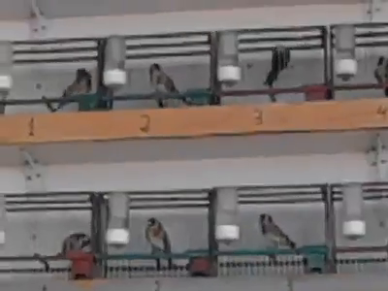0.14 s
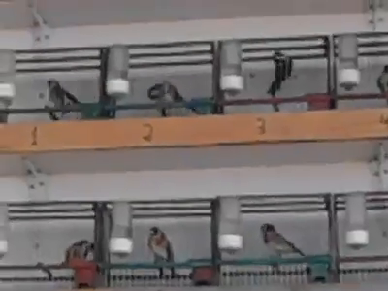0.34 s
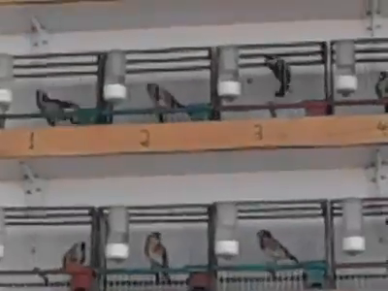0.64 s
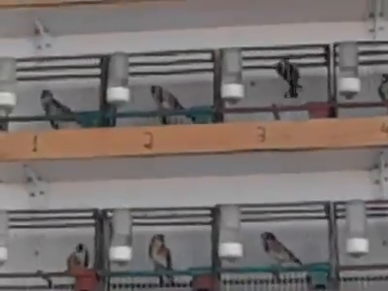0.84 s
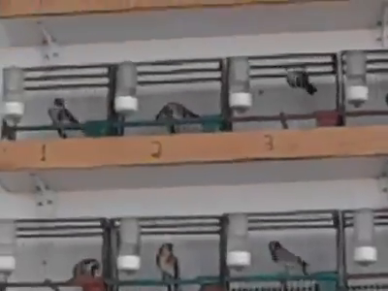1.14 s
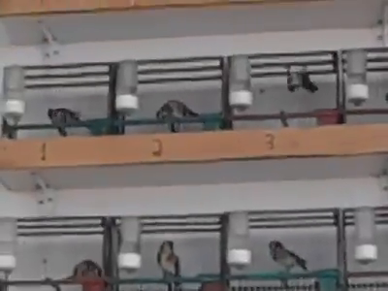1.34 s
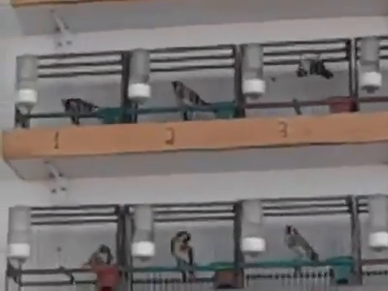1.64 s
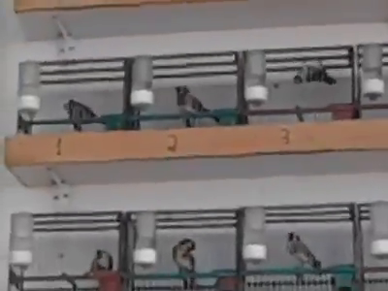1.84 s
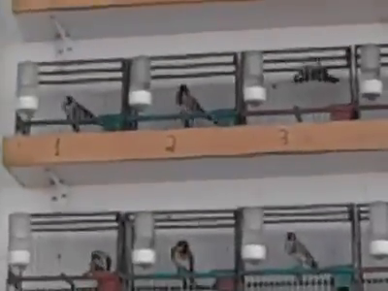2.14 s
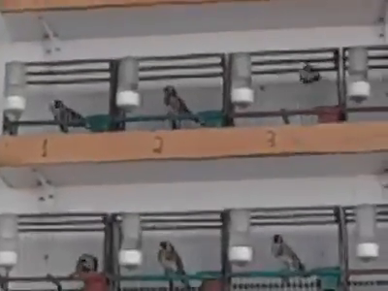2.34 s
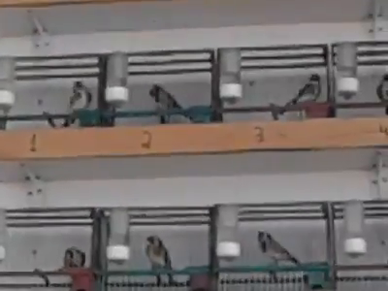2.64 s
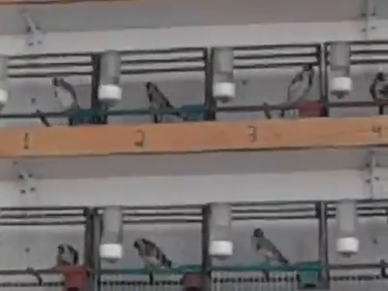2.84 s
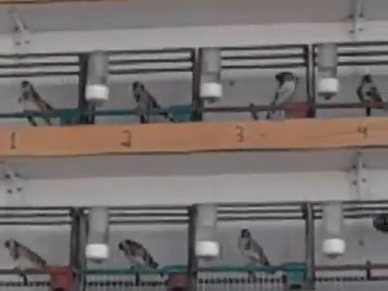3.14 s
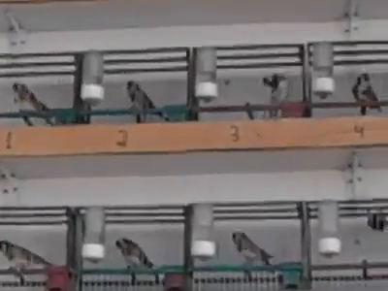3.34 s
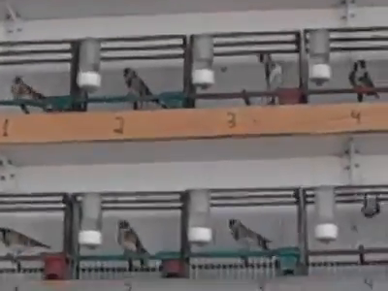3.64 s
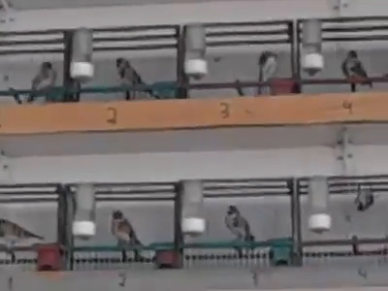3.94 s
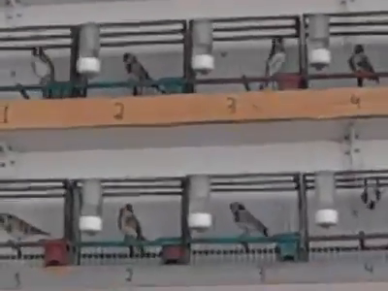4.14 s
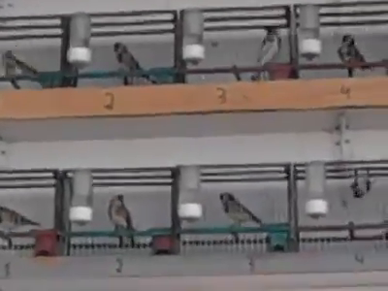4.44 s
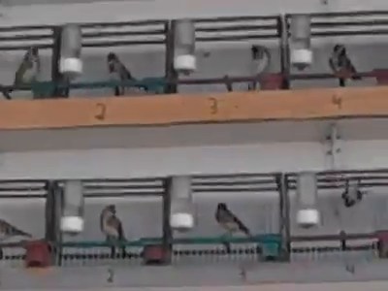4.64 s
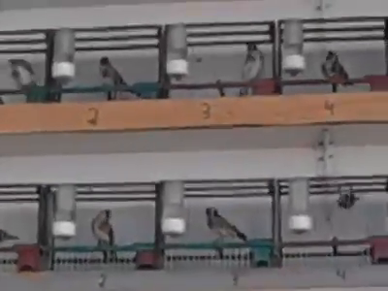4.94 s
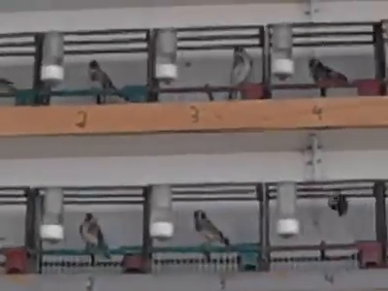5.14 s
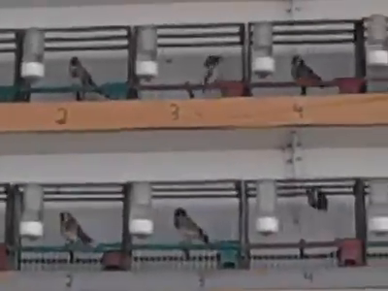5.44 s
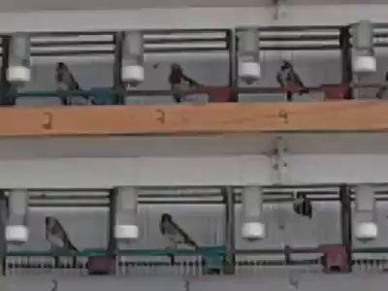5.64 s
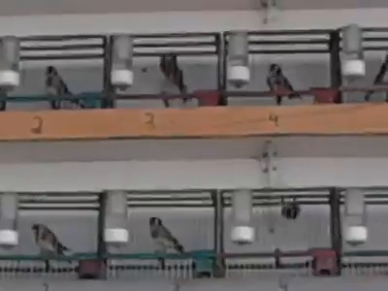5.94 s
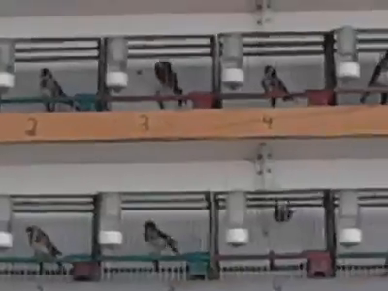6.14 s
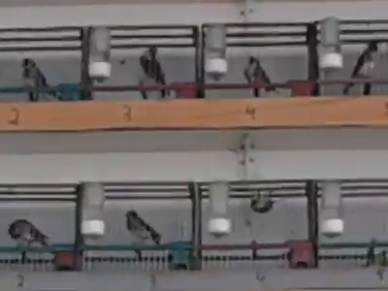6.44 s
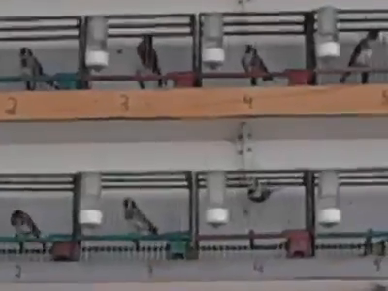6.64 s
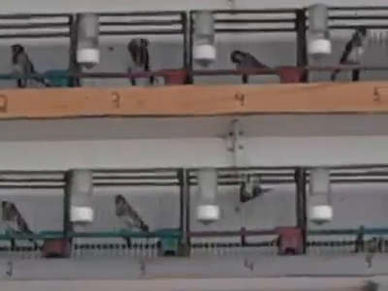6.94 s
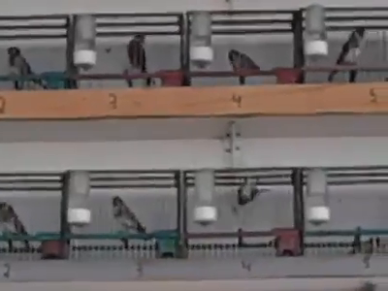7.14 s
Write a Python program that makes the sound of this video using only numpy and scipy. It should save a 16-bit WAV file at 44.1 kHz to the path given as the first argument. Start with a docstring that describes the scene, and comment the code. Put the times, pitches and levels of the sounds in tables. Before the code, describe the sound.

Goldfinches sing in cages in a hard room with a short bright ring, over soft hiss and faint low air noise. At 0 s distant twitters and a high peep sound; about 0.3 s a slurred phrase begins with a faint dull knock, closing on a piercing whistle before a harsh, chattering scold at 0.5. A fuzzy wheeze drifts from 0.55 to 2.6, with a fainter, higher rising one around 0.9-1.3. A quick tumbling phrase comes at 1.3, a softer slur at 1.9, another at 2.6. At 2.95 slur and scold overlap with chatter, while a quiet low scraping drone runs until 3.7. Another tumble follows, then sharp calls near 4.0. It thins until a scold and flurry at 5.15. Snappy chups and flicks lead to a strong slur at 5.9 and a tumble at 6.26; after a lull, dense calls and a final slur fill 6.9-7.2.

```python
"""Caged goldfinches twitter in a hard-walled room. Far-off twittering and single calls open the scene.
A knock and the first slurred phrase follow, then a scold, two long wheezes and a tumbling phrase.
Near the middle a droning scrape sounds; a narrow hiss and a low hum swell now and then; the phrases return
to the end. Birds are gliding tones, with noise to roughen them; echoes make the cages and the room.
All levels in dB are before the mixing at the end."""
import sys
import numpy as np
from scipy import signal
from scipy.fft import rfft, irfft
from scipy.io import wavfile
from scipy.ndimage import uniform_filter1d

SR = 44100
rng = np.random.default_rng(int(sys.argv[2]) if len(sys.argv) > 2 else 0)


def wrap_up_sound(samples):
    """Save the sound to the file named by the first command line argument, as 16-bit audio."""
    columns = np.atleast_2d(samples).T
    # keep every value between -1 and 1, then stretch to whole-number steps
    tamed = np.clip(columns, -1, 1)
    steps = np.round(tamed * 32767).astype(np.int16)
    wavfile.write(sys.argv[1], SR, steps)


N = 321930
TIME = np.arange(N) / SR
FREQS = np.fft.rfftfreq(N, 1 / SR)


def gain_of(db):
    """Turns decibels into a factor."""
    return 10 ** (np.asarray(db) / 20)


def evened(x):
    """Scales a sound to an rms of 1."""
    return x / np.sqrt(np.mean(x ** 2) + 1e-20)


def read(points, hz):
    """Reads a table of values against frequency, on a log-frequency axis."""
    f, value = np.transpose(points)
    return np.interp(np.log(hz + 1), np.log(f + 1), value)


def curves(rows):
    """Draws each column of a time table as a curve over the whole scene."""
    s, *columns = np.transpose(rows)
    return [np.interp(TIME, s, c) for c in columns]


def swells(rows, rest_db):
    """Makes a gain with bell-shaped swells over a resting level."""
    gain = gain_of(rest_db)
    for s, width, db in rows:
        gain = gain + gain_of(db) * np.exp(-.5 * ((TIME - s) / width) ** 2)
    return gain


def add(mix, s, sound):
    """Mixes a sound in at its time."""
    part = mix[max(round(s * SR), 0):][:len(sound)]
    part += sound[:len(part)]


def glide(hz):
    """Adds up a changing pitch into the phase of a sine wave."""
    return 2 * np.pi * np.cumsum(hz) / SR


def noise(gain):
    """Shapes random noise with a gain per frequency, at an rms of 1."""
    return evened(irfft(rfft(rng.standard_normal(N)) * gain, N))


def band(hz, width_hz):
    """Makes noise in one bell-shaped band; a band at 0 Hz is a slow random drift."""
    return noise(np.exp(-.5 * ((FREQS - hz) / width_hz) ** 2))


# The spectrum of still air. Each row: frequency in Hz, relative level in dB.
AIR = [(18, -32), (30, -0.5), (44, 0), (96, 1.5), (157, -3.5), (244, -1), (949, -4), (1500, -8),
       (1950, -48), (3300, -120)]


def still_air():
    """Steady noise, mostly low, stands for the still air."""
    return gain_of(-75.5) * noise(gain_of(read(AIR, FREQS)))


# The spectrum of the wash. Each row: frequency in Hz, relative level in dB.
WASH = [(710, -53.5), (1200, -17), (1580, -15), (2360, -7), (2660, -7), (2740, -5.5), (4290, -7.5),
        (4640, -21), (5430, -10.5), (5880, -10), (7860, -25), (10200, -56.5), (17300, -120)]


def treble_wash():
    """Steady soft noise lies under the song."""
    return gain_of(-66) * noise(gain_of(read(WASH, FREQS)))


def microphone_hiss():
    """The microphone adds faint noise, equal at all frequencies."""
    return gain_of(-92.5) * noise(1)


# Swells of the hum. Each row: centre in seconds, half width in seconds, level in dB.
HUM = [(3.58, 0.17, -74.5), (4.19, 0.048, -68.5), (5.0, 0.12, -72.5), (6.2, 0.044, -76),
       (6.89, 0.14, -71.5), (6.0, 1.9, -95)]


def low_hum():
    """Two narrow bands of low noise swell together."""
    return swells(HUM, rest_db=-91.5) * (band(119, 7.2) + 0.57 * band(175, 25))


# Swells of the hiss. Each row: centre in seconds, half width in seconds, level in dB.
HISS = [(1.42, 0.29, -63.5), (2.0, 0.036, -68), (3.0, 1.3, -77), (3.9, 0.16, -67), (4.52, 0.13, -67)]


def narrow_hiss():
    """A narrow band of noise swells and fades behind the birds."""
    return swells(HISS, rest_db=-97) * band(1707, 160)


# The knock's ringing tones. Each row: pitch in Hz, level in dB, time to fade by 60 dB in seconds.
KNOCK = [(176, 4, 0.11), (310, 0.5, .08), (430, 7, 0.064), (720, -8, 0.0569)]


def knock():
    """A dull blow sets off a few low tones that die away fast."""
    out, t = np.zeros(N), np.arange(SR // 2) / SR
    for hz, db, t60 in KNOCK:
        ring = gain_of(db - 60 * t / t60) * np.sin(2 * np.pi * hz * t)
        add(out, .336, gain_of(-68.5) * ring)
    return out


# Faint far tones. Each row: start in seconds, length in seconds, pitch in Hz, level in dB.
FAR_TONES = [(.6, 0.49, 481, -81.5), (2.363, 0.35, 792, -66), (5.157, 0.11, 794, -72),
             (5.792, 0.018, 1266, -64.5), (6.49, 0.2, 336, -75)]


def far_tones():
    """Plain steady sine tones fade softly in and out."""
    out = np.zeros(N)
    for s, length, hz, db in FAR_TONES:
        t = TIME[:round(length * SR)]
        add(out, s, gain_of(db) * signal.windows.tukey(len(t), .5) * np.sin(2 * np.pi * hz * t))
    return out


# The scrape's course. Each row: time in seconds, level in dB, pitch in Hz.
SCRAPE = [(2.95, -75, 262.1), (3.04, -59.5, 260.5), (3.12, -61, 247.6), (3.19, -57, 260.2),
          (3.3, -58, 251.6), (3.42, -59.5, 253.4), (3.52, -60.5, 256.8), (3.61, -60.5, 263.3),
          (3.68, -92, 263)]
# Its overtones. Each row: multiple of the pitch, level in dB against the others, time it sets in, in seconds.
SCRAPE_ORDERS = [(1, 0.5, 3.2), (2, -0.5, 2.96), (3, -13.5, 3.3), (4, -4, 3.13), (5, -9.5, 3.14),
                 (6, -22.5, 2.4)]
ORDER_RISE_S = 0.035


def scrape():
    """Something slips and sticks over and over: a hoarse drone with rubbing noise."""
    db, hz = curves(SCRAPE)
    phase = glide(hz * (1 + 0.0092 * band(0, 60)))
    drone = np.zeros(N)
    for multiple, level, s in SCRAPE_ORDERS:
        fade_in = np.clip((TIME - s) / ORDER_RISE_S, 0, 1)
        drone += gain_of(level) * np.sin(multiple * phase) * fade_in
    rub = 0.2 * band(170, 72) + 0.34 * band(470, 250) + 0.35 * band(1110, 250)
    sounding = (TIME > SCRAPE[0][0]) * (TIME < SCRAPE[-1][0])
    return gain_of(db) * (0.97 * evened(drone) + rub) * sounding


# The room's ring. Each row: frequency in Hz, time to fade by 60 dB in seconds.
ROOM = [(200, 0.4), (2500, 0.44), (4000, 0.37), (6000, 0.43), (8000, 0.42), (13000, 0.14)]


def tail(rise_s):
    """Sparse echoes of random sign, each band dying at its own speed; total energy is about 1."""
    count = SR // 8
    taps = np.zeros(SR)
    places = np.arange(count) * 8 + rng.integers(0, 8, count)  # one echo in every 8 samples
    taps[places] = rng.choice([-1., 1.], count)
    hz, t, z = signal.stft(taps, SR, nperseg=256)
    decay = gain_of(-60 * t / read(ROOM, hz)[:, None])
    ring = signal.istft(z * decay, SR, nperseg=256)[1]
    ring *= 1 - np.exp(-np.arange(len(ring)) / SR / rise_s)
    return ring / np.linalg.norm(ring)


def room(x, early_db, tail_db, early_s):
    """Direct sound, first echoes from cage walls and shelves, then the ring of the room."""
    delay, sign = rng.uniform(.1, 1, 14), rng.choice([-1., 1.], 14)
    early = np.zeros(SR)
    early[(delay * early_s * SR).astype(int)] = sign * np.exp(-delay)
    early /= np.linalg.norm(early)
    echoes = gain_of(early_db) * early + gain_of(tail_db) * tail(rise_s=0.0078)[:SR]
    return x + signal.fftconvolve(x, echoes)[:N]


# Bouts of distant twittering. Each row: centre in seconds, half width in seconds, level in dB.
TWITTER = [(.03, 0.1, -40), (.37, 0.13, -39), (1.2, 0.28, -55.5), (3.3, 0.61, -69.5), (6.5, 0.99, -54.5)]


def twitter():
    """Random short glides from the far cages, heard only through the room."""
    out = np.zeros(N)
    for when, span, pitch, slope in rng.random((420, 4)):
        u = np.linspace(0, 1, round((0.012 + 0.027 * span) * SR))
        hz = 4200 * (1 + .45 * (pitch - .5)) * (1 + 0.57 * (slope - .5) * (u - .5))
        add(out, when * N / SR, np.hanning(len(u)) * np.sin(glide(hz)))
    wet = irfft(rfft(out) * rfft(tail(rise_s=0.019), N), N)
    return swells(TWITTER, rest_db=-78) * evened(wet)


# Two long wheezes, one list of rows for each. Each row: time in seconds, pitch in Hz, level in dB.
WHEEZES = [
    [(.55, 2550, -40.5), (.66, 2460, -42), (1.0, 2501, -42), (1.3, 2422, -40.5), (1.62, 2396, -47),
     (1.85, 2355, -54), (2.05, 2346, -54), (2.35, 2416, -57), (2.6, 2360, -67)],
    [(.78, 3990, -75), (.88, 4140, -49), (.98, 4320, -49.5), (1.08, 5540, -53), (1.2, 5660, -64),
     (1.3, 5630, -79.5)],
]


def wheezes():
    """A fuzzy whistle drifts in pitch, with a weaker skirt of noise below it."""
    out = np.zeros(N)
    for rows in WHEEZES:
        hz, db = curves(rows)
        phase = glide(hz)
        fuzz = band(0, 65) * np.sin(phase) + 0.46 * band(0, 180) * np.sin(.94 * phase)
        out += gain_of(db) * evened(fuzz) * (TIME > rows[0][0]) * (TIME < rows[-1][0])
    return out


def song(notes, waver, flutter, taper, second_db, third_db, fizz_db):
    """The syrinx glides through three pitches a note; waver bends its pitch and flutter its strength."""
    out = np.zeros(N)
    fizz = gain_of(fizz_db) * band(10140, 2100)  # a bright hiss rides on the notes
    for s, length, start, middle, end, db in notes:
        at = np.clip(round(s * SR) + np.arange(max(round(length * SR), 64)), 0, N - 1)
        u = np.linspace(0, 1, len(at))
        hz = np.polyval(np.polyfit([0, .5, 1], [start, middle, end], 2), u)
        phase = glide(hz * (1 + waver[at]))
        second = gain_of(second_db) * np.sin(2 * phase)
        third = gain_of(third_db) * np.sin(3 * phase) * (hz < SR / 6)  # left out where too high
        tone = np.sin(phase) + second + third + fizz[at]
        swell = signal.windows.tukey(len(at), np.clip(taper, .1, 1))
        add(out, s, gain_of(db) * swell * tone * (1 + flutter[at]))
    return out


def note(shape, voice, s, length, hz, db):
    """Sings a pitch shape at a given pitch: start, length, three pitches, level, voice."""
    return (s, length, *(hz * np.array(shape)), db, voice)


# Pitch shapes. Each holds the start, middle and end as multiples of a note's pitch.
LEVEL, HOLD, LEAD = (1.008, 1, 1.004), (.95, 1, 1.008), (.67, .77, .86)
CHUP, FLICK, DROP, BUZZ = (.83, 0.97, 1.065), (.7, 1, 1.3), (1.23, 1, 0.863), (0.98, 1, 1.04)
# Flurries of tiny chirps. Each row: start in seconds, length in seconds, level in dB.
FLURRIES = [(0.106, 0.049, -35.5), (0.478, .16, -33), (1.167, 0.032, -43.5), (2.811, 0.093, -41),
            (2.947, 0.17, -32.5), (3.219, 0.04, -34.5), (3.746, 0.089, -44), (5.162, .2, -30),
            (5.752, 0.13, -39.5), (6.221, 0.052, -39.5), (7.059, 0.17, -41.5)]
CHIRPS_PER_S, CHIRP_S, CHIRP_SPREAD_DB = 83, .013, 10
CHIRP_LOW_HZ, CHIRP_HIGH_HZ = 2900, 5800


def flurry(s, length, db):
    """Tiny rising chirps tumble over each other at random pitches."""
    notes = []
    for when, span, pitch, force in rng.random((round(length * CHIRPS_PER_S), 4)):
        hz = CHIRP_LOW_HZ * (CHIRP_HIGH_HZ / CHIRP_LOW_HZ) ** pitch
        level = db + CHIRP_SPREAD_DB * (force - .5)
        notes.append(note(CHUP, "clear", s + length * when, CHIRP_S * (.5 + span), hz, level))
    return notes


def chatter():
    """Sings all the flurries as nearly pure glides."""
    notes = [values for row in FLURRIES for *values, _ in flurry(*row)]
    return song(notes, .002 * band(0, 130), 0.077 * band(0, 200), taper=0.62,
                second_db=-33, third_db=-38, fizz_db=-41)


# Single calls: short rising chups, level peeps, forced downward drops, raspy calls and steep upward flicks.
# Each row: start in seconds, length in seconds, pitch in Hz (times the shape), level in dB.
CHUPS, PEEPS, DROPS = [(.137, 0.018, 3280, -40.5), (.36, 0.014, 2940, -32.5), (1.059, 0.022, 3025, -37),
                       (1.175, 0.024, 3380, -33), (1.317, 0.016, 3150, -31), (1.704, 0.0082, 3730, -30.5),
                       (4.564, 0.011, 2920, -45), (4.65, .013, 3085, -35), (4.761, .012, 3315, -39),
                       (5.034, 0.022, 3415, -31.5), (5.446, 0.0174, 3116, -30), (5.828, 0.014, 3460, -32.5),
                       (5.857, 0.015, 3080, -28.5), (5.94, 0.049, 2875, -41), (6.969, 0.014, 3600, -25),
                       (7.038, 0.019, 5640, -22.5), (7.164, 0.014, 5530, -24), (7.175, 0.03, 3620, -26.5)], [(0, 0.018, 4980, -32.5), (.02, .24, 4385, -49.5),
                                      (.66, .32, 4306, -50.5), (.945, 0.056, 4526, -46.5),
                                      (2.178, .028, 4284, -29.5), (2.78, 0.73, 3390, -44.5),
                                      (3.266, 0.045, 3410, -38.5), (3.37, 0.23, 3470, -43),
                                      (3.654, 0.034, 4270, -42), (3.932, 0.012, 4290, -22.5),
                                      (4.86, 0.16, 3756, -49), (5.936, 0.041, 4779, -24),
                                      (7.121, 0.0088, 4270, -20.5)], [(2.169, 0.016, 5800, -27), (3.998, 0.035, 3735, -31.5),
                                                     (5.777, .017, 2960, -37.5), (6.223, 0.018, 5280, -36)]
RASPS, FLICKS = [(.094, 0.047, 6210, -46), (.18, .07, 4020, -39.5), (.288, 0.047, 5376, -37.5),
                 (.496, .03, 2190, -45), (1.173, 0.012, 5570, -52.5), (2.469, .012, 5340, -46),
                 (2.566, 0.034, 6250, -53.5), (2.814, 0.015, 4180, -33.5), (2.815, .044, 3306, -39.5),
                 (2.844, .035, 4990, -41), (3.254, 0.022, 5330, -38), (3.786, 0.0079, 4200, -40.5),
                 (3.952, 0.023, 6950, -30), (5.136, 0.0087, 4900, -37), (5.19, 0.015, 2810, -34.5),
                 (5.75, 0.014, 5910, -35), (5.809, 0.013, 5800, -31), (6.761, 0.029, 5360, -47),
                 (6.916, .047, 6990, -38), (6.954, 0.013, 5730, -35.5), (6.979, 0.033, 2784, -37.5),
                 (7.07, 0.037, 6530, -32.5), (7.205, 0.029, 7160, -33), (7.206, 0.026, 5670, -39)], [(.124, .015, 4610, -34), (2.821, 0.024, 5250, -38),
                                (3.223, 0.018, 4900, -38), (5.094, 0.022, 4600, -31.5),
                                (5.346, 0.022, 4520, -25.5), (5.767, 0.014, 4080, -28.5),
                                (5.848, 0.02, 4220, -24), (6.238, 0.01, 3940, -28.5),
                                (6.828, 0.031, 3770, -37.5)]
FLICK_S = .024  # a flick this long covers the whole FLICK shape; a shorter one covers less


def single_calls():
    """Each kind of call bends its pitch along its own shape."""
    notes = []
    for calls, shape, voice in [(CHUPS, CHUP, "clear"), (PEEPS, LEVEL, "clear"),
                                (DROPS, DROP, "forced"), (RASPS, BUZZ, "buzzy")]:
        notes += [note(shape, voice, *row) for row in calls]
    for s, length, hz, db in FLICKS:
        notes.append(note(np.power(FLICK, length / FLICK_S), "clear", s, length, hz, db))
    return notes


# Two-note calls. Each row: start in seconds, length in seconds, low and high pitch in Hz,
# low and high note's level in dB.
CHORDS = [(1.756, 0.012, 5563, 6786, -26, -26.5), (3.987, 0.02, 5916, 7190, -21, -34),
          (4.754, 0.025, 5686, 6660, -51, -49.5), (5.538, 0.023, 5870, 6830, -29, -27.5),
          (5.66, 0.018, 5020, 5995, -25, -25)]


def chords():
    """Both sides of the syrinx sound at once, each at its own pitch."""
    notes = []
    for s, length, low_hz, high_hz, low_db, high_db in CHORDS:
        notes.append(note(LEVEL, "clear", s, length, low_hz, low_db))
        notes.append(note(HOLD, "clear", s, length, high_hz, high_db))
    return notes


# Slurred phrases. Each row: start in seconds, pip's pitch in Hz and level in dB, held pitch in Hz and
# level in dB, octave's level in dB, closing whistle's delay and length in seconds, pitch in Hz, level in dB.
SLURS = [(0.297, 4730, -20.5, 3408, -26, -42, 0.1764, 0.037, 5960, -15),
         (1.896, 4565, -30, 3231, -35.5, -27.5, .254, 0.018, 5680, -22),
         (2.612, 4986, -28, 3846, -22, -37, 0.14, 0.039, 6516, -20.5),
         (2.985, 4900, -27.5, 3820, -22.5, -37, 0.1477, 0.069, 6400, -31),
         (5.931, 5023, -21, 3366, -32.5, -33.5, .207, .044, 6053, -14.5),
         (6.904, 4970, -21.5, 3851, -22.5, -40.5, 0.16, 0.049, 6400, -29.5)]
LEAD_S, LEAD_DB, PIP_S = .036, -16.5, 0.023  # the lead-in rises before the pip, and is this much weaker
HOLD_DELAY_S, HOLD_UNTIL, FLIP_AT = .034, 0.934, 0.58  # the last two as shares of the closing delay


def slur(s, pip_hz, pip_db, held_hz, held_db, octave_db, delay, close_s, close_hz, close_db):
    """Lead-in, pip, a held tone joined by its octave, closing whistle."""
    held_s = HOLD_UNTIL * delay - HOLD_DELAY_S
    octave_hz = 2 * held_hz * HOLD[-1]
    return [note(LEAD, "buzzy", s - LEAD_S, LEAD_S, pip_hz, pip_db + LEAD_DB),
            note(LEVEL, "clear", s, PIP_S, pip_hz, pip_db),
            note(HOLD, "swelling", s + HOLD_DELAY_S, held_s, held_hz, held_db),
            note(LEVEL, "swelling", s + FLIP_AT * delay, (1 - FLIP_AT) * delay, octave_hz, octave_db),
            note(LEVEL, "swelling", s + delay, close_s, close_hz, close_db)]


def phrase(pattern, s, stretch, level_db):
    """Sings a set phrase with its timing stretched and its level shifted."""
    return [(s + delay * stretch, length * stretch, *pitches, db + level_db, voice)
            for delay, length, *pitches, db, voice in pattern]


# The tumble (a chup, then three steps down) and the scold (harsh, ending in a forced fall).
# Each row: delay in seconds and length in seconds, both before stretching, start, middle and end pitch in Hz,
# level in dB before the phrase's own level, voice.
TUMBLE, SCOLD = [(-.142, 0.017, 4100, 4536, 4600, -39, "clear"),
                 (-.123, 0.016, 2900, 3276, 3450, -39.5, "clear"),
                 (0, .019, 2690, 3406, 3550, -24, "clear"), (.073, .02, 6600, 6480, 6400, -45, "buzzy"),
                 (.088, .024, 3150, 3510, 3850, -38.5, "buzzy"),
                 (.128, 0.026, 2800, 3565, 3850, -41.5, "clear"),
                 (.14, .014, 6200, 6340, 7000, -24.5, "clear"),
                 (.143, .01, 8930, 7270, 6300, -47.5, "buzzy"),
                 (.165, 0.034, 5500, 4553, 4150, -26.5, "clear"),
                 (.214, .024, 3750, 3122, 3040, -29, "clear")], [(0, .026, 6230, 7040, 7500, -32, "buzzy"),
                                 (.014, .026, 4980, 5520, 5440, -37, "buzzy"),
                                 (.021, 0.037, 3285, 3623, 3930, -27, "clear"),
                                 (.058, .018, 2670, 2640, 3100, -30, "clear"),
                                 (.08, 0.021, 4050, 4400, 4570, -20.5, "clear"),
                                 (.104, .025, 4400, 4450, 4460, -31, "buzzy"),
                                 (.115, 0.043, 8620, 6945, 5550, -33, "forced"),
                                 (.137, .034, 3966, 3150, 2600, -26.5, "forced")]
# When they are sung. Each row: start in seconds, time stretch as a factor, level in dB.
TUMBLES, SCOLDS = [(1.294, .99, -2), (3.688, 0.97, -0.5), (6.262, 1, -4)], [(0.482, 0.79, -1), (2.947, 0.99, -4), (5.156, 0.99, -5)]


def sung(voice):
    """Gathers all the notes of the phrases and single calls that are sung in one voice."""
    notes = single_calls() + chords()
    for row in TUMBLES:
        notes += phrase(TUMBLE, *row)
    for row in SCOLDS:
        notes += phrase(SCOLD, *row)
    for row in SLURS:
        notes += slur(*row)
    return [values for *values, kind in notes if kind == voice]


def rasps():
    """Fast irregular trembling of the syrinx spreads each note into a buzz."""
    return song(sung("buzzy"), 0.043 * band(260, 110), 0.12 * band(340, 170), taper=0.42,
                second_db=-32.5, third_db=-50, fizz_db=-35.5)


def forced():
    """Notes pushed hard: a little rough, with a stronger third harmonic and a spray of hiss."""
    return song(sung("forced"), 0.02 * band(180, 110), 0.099 * band(380, 260), taper=0.54,
                second_db=-37, third_db=-26, fizz_db=-27)


def long_tones():
    """The long notes of a slur swell and fade smoothly, with a faint third harmonic."""
    return song(sung("swelling"), 0.0016 * band(0, 130), 0.19 * band(0, 230), taper=0.82,
                second_db=-45.5, third_db=-38.5, fizz_db=-52.5)


def whistles():
    """Nearly pure notes with a slight unsteadiness."""
    return song(sung("clear"), 0.0027 * band(0, 130), 0.25 * band(0, 200), taper=0.55,
                second_db=-36, third_db=-43.5, fizz_db=-52)


def scene():
    """Mixes the birds and the far sounds in one room."""
    background = still_air() + treble_wash() + microphone_hiss() + low_hum()
    far = room(scrape() + knock() + far_tones(), early_db=-12, tail_db=-12, early_s=.02)
    buzzy = room(rasps() + forced(), early_db=-2.5, tail_db=-2.0, early_s=0.014)
    clear = room(whistles() + long_tones() + chatter(), early_db=-2.5, tail_db=-4, early_s=.02)
    mix = background + gain_of(-1.5) * narrow_hiss() + gain_of(2.5) * far
    mix += gain_of(-2.0) * twitter() + gain_of(-4.0) * wheezes()
    mix += gain_of(.5) * buzzy + gain_of(-1.5) * clear
    return mix[None]


# The suppressor's threshold, which falls away in the second half. Each row: time in seconds, level in dB.
THRESHOLD = [(0, -58.5), (3.3, -69), (4.2, -56), (4.6, -97.5)]


def suppress(x, depth_db):
    """A noise suppressor turns down what sinks under its threshold, mostly treble, and shortens the ring."""
    hz, t, z = signal.stft(x, SR, nperseg=512, noverlap=384)
    power = uniform_filter1d(abs(z) ** 2, size=5, axis=-1)  # smoothed over time
    power = uniform_filter1d(power, size=3, axis=-2)  # smoothed over frequency
    threshold = gain_of(np.interp(t, *np.transpose(THRESHOLD))) ** 2
    share = read([(2400, 0.29), (2900, 0.75)], hz)[:, None]  # share of the depth used at each Hz
    weak = threshold / (threshold + abs(power)) * share
    return signal.istft(z * gain_of(depth_db * weak), SR, nperseg=512, noverlap=384)[1][:, :N]


# Microphone colour. Each row: frequency in Hz, gain in dB.
MIC = [(30, -3.5), (6500, 0.5), (7500, -8), (8400, -4), (9300, -16.5), (10300, -4), (12200, -1),
       (13300, -11), (15000, -18)]
EDGE_HZ = 15600  # little is left above this


def record(dry):
    """Noise suppression, microphone colour, then the band limit."""
    spectrum = rfft(suppress(dry, depth_db=-6.0), 2 * N)
    colour = gain_of(read(MIC, np.fft.rfftfreq(2 * N, 1 / SR)))
    coloured = irfft(spectrum * colour)[:, :N]
    low_pass = signal.firwin(511, EDGE_HZ, window=("kaiser", 9), fs=SR)
    return signal.oaconvolve(coloured, low_pass[None], "same")


dry = scene()
out = record(dry)
wrap_up_sound(out)
```